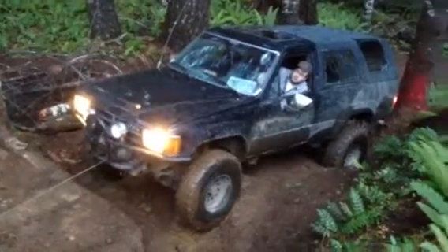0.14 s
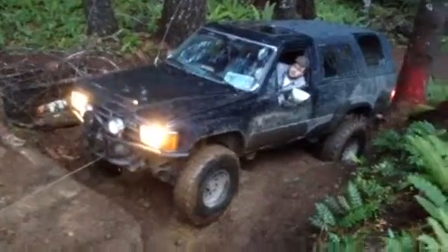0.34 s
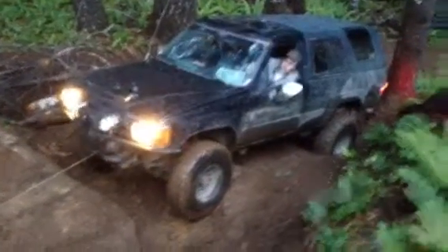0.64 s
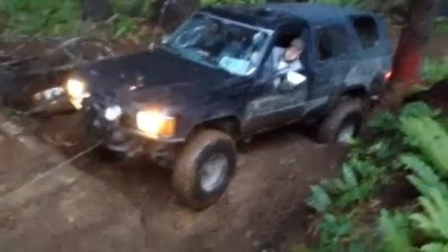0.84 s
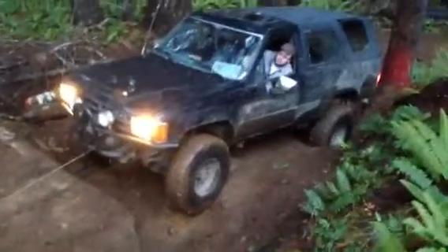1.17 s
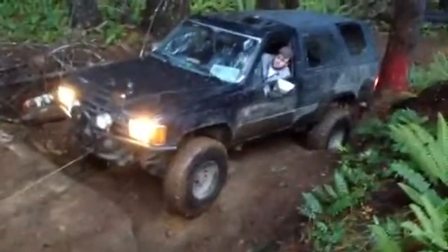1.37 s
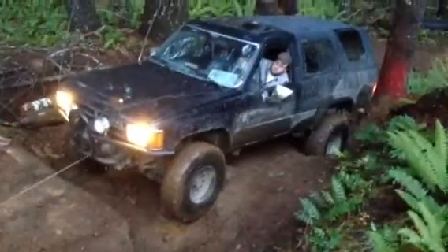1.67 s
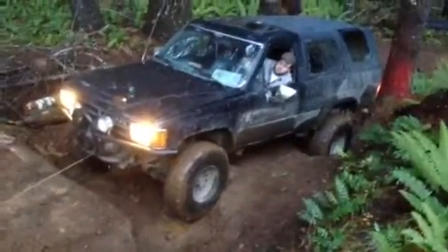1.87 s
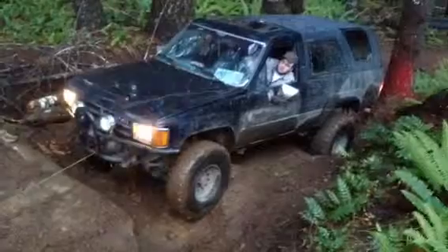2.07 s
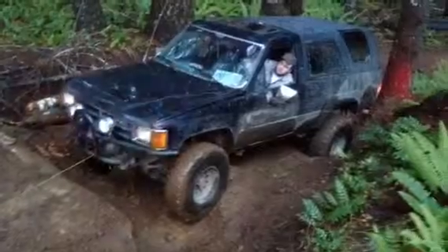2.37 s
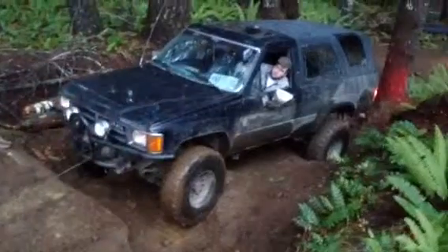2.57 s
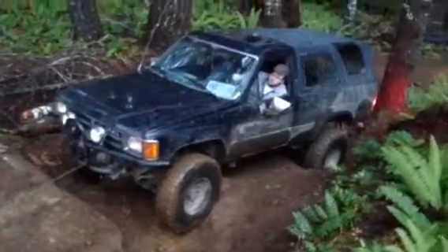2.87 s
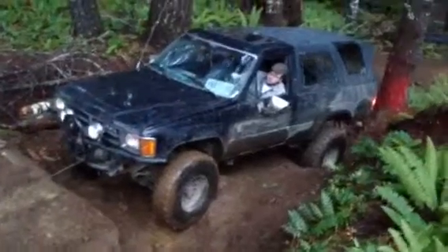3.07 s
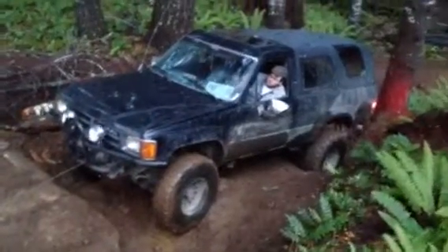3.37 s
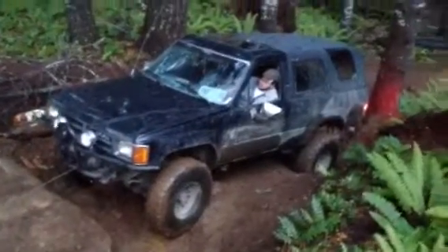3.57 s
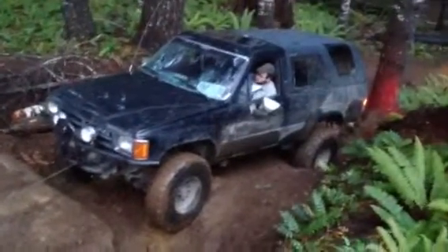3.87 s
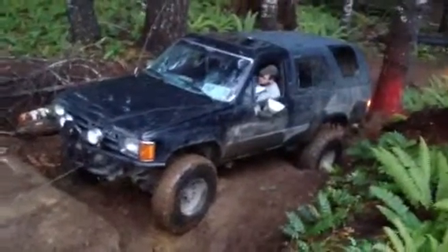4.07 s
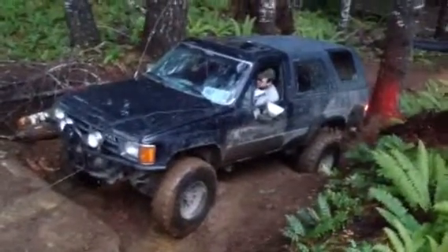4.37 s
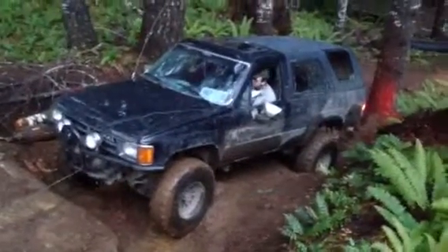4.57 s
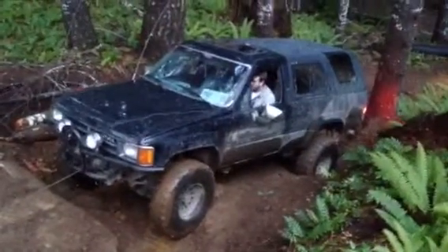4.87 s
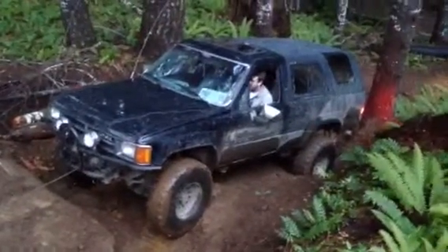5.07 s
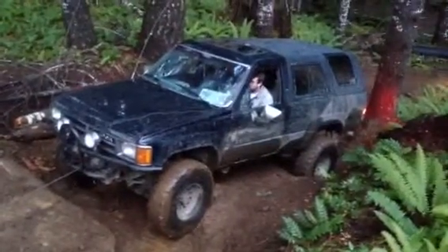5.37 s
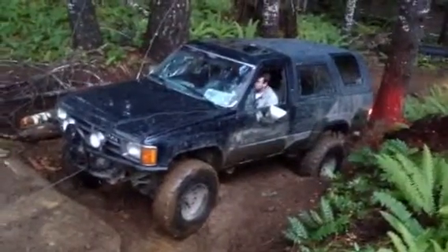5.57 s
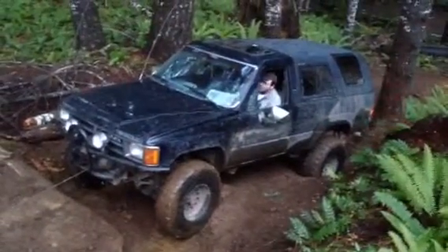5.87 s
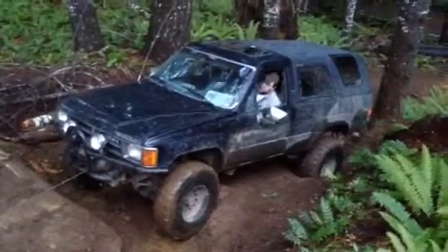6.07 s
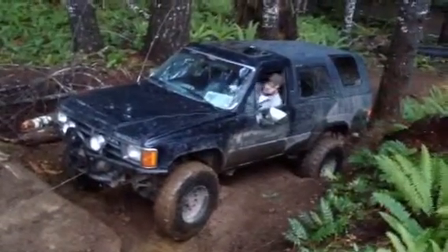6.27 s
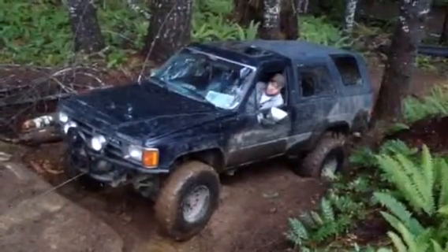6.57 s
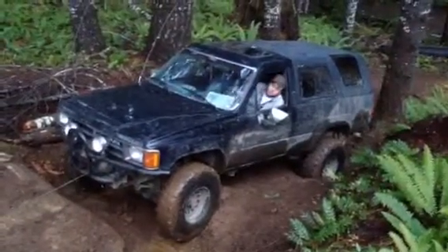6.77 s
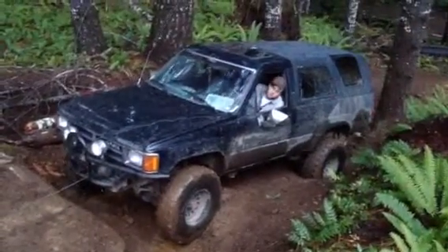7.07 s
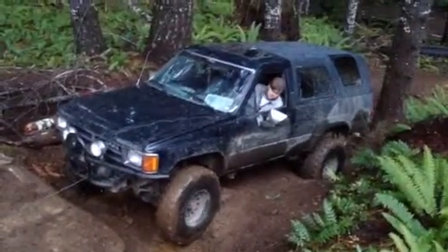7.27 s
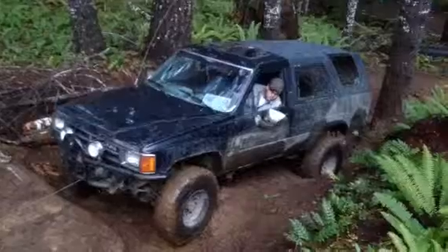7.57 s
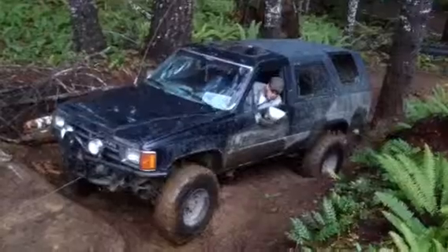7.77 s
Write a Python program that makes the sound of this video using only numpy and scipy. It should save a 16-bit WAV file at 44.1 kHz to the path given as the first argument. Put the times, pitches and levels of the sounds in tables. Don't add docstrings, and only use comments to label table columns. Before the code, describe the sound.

A muddy truck stands a few metres away on a forest trail, its four-cylinder engine idling throughout with a lumpy, low exhaust throb, small stumbles, light valve rattle and a steady broadband hiss of fan and gears. Thin, quiet belt chirps flick past at intervals from about 1.3 s. Close to the small, bass-light microphone, wet cloth brushes at 0 s, then rubs and squeaks at 0.8-1.1 s with a sharp snap near 1 s. A tiny crackle comes at 2.3 s; otherwise the idle dominates. Soft dull knocks fall at 5.0 s, with a short rustle and snap at 5.3 s. The engine begins pulling harder around 6 s and is more even from 6.6 s, as cloth and ferns rub busily with gliding squeaks and dry cracks until 7.4 s. At 7.6 s the throttle opens: air rushes in and firing quickens to the end, amid last rustles.

```python
import sys
import numpy as np
from scipy import signal
from scipy.fft import rfft, irfft, next_fast_len
from scipy.io import wavfile
from scipy.ndimage import uniform_filter1d, map_coordinates

SR = 44100
rng = np.random.default_rng(int(sys.argv[2]) if len(sys.argv) > 2 else 0)


def gain_from_db(level_db):
    decades = np.asarray(level_db, float) / 20
    return 10 ** decades


def store_pcm(level_fs):
    pcm = np.round(np.clip(level_fs, -1, 1) * 32767).astype(np.int16)
    wavfile.write(sys.argv[1], SR, np.atleast_2d(pcm).T)


N = 349713

# (frequency [Hz], level [dB per Hz])
MACHINE_HISS = [(220, 0), (380, -6), (472, -5.5), (577, -8.5), (643, -1.5), (946, -2), (1140, -7),
                (1550, -9.5), (1930, -7), (3260, -10.5), (4230, -8), (5510, -7.5), (7390, 0), (9600, -11.5),
                (15300, -19.5)]
# (first slip [s], slips [count], peak [dB], pitch [Hz])
BELT_SLIPS = [(1.28, 2, -53, 4320), (1.562, 2, -55, 4570), (1.79, 1, -53, 4380), (1.898, 8, -55.5, 4450),
              (3.70, 2, -54, 4350), (3.97, 1, -56, 4640), (4.164, 1, -54, 4170), (4.398, 1, -52, 4280),
              (4.838, 1, -55, 4640), (5.41, 4, -55, 4220), (5.86, 1, -53, 4800), (6.223, 1, -53, 4140),
              (6.321, 1, -57, 4640), (7.694, 1, -53, 4180), (7.735, 1, -55, 3800), (7.8, 1, -51, 3850),
              (7.83, 1, -51, 4250), (7.885, 1, -52, 3800)]
# (frequency [Hz], level [dB per Hz])
INTAKE_RUSH = [(500, -28), (2000, -17), (4200, -6), (5500, -10), (7500, 1.5), (9600, -11.5), (12500, -9),
               (15300, -24)]

# (time [s], peak [dB], body [dB re peak], decay by 60 dB [s])
SNAPS = [(0.7298, -35.5, -14, 0.056), (0.74, -37, -14, 0.029), (0.842, -33, -17, 0.033),
         (0.9775, -21.5, -14, 0.0095), (2.3494, -48, -16, 0.02), (5.3192, -31.5, -22, 0.045),
         (5.335, -36, -13, 0.039), (6.601, -32, -15, 0.029), (6.851, -27, -23, 0.065),
         (6.86, -35, -31, 0.027), (7.138, -28, -21, 0.02), (7.038, -42, -22, .02), (7.196, -45, -17, .02),
         (7.223, -37, -20, 0.018), (7.392, -35, -12, 0.025), (7.781, -41, -20, .03),
         (0.3653, -37, -14, 0.022), (1.717, -37, -20, .02), (7.244, -30.5, -23, 0.048),
         (7.313, -27, -30, 0.023), (7.3278, -27, -27, 0.052)]
# (frequency [Hz], level [dB per Hz])
CRACK_COLOUR = [(2000, -30), (3000, -31), (6500, 11), (9000, 3), (12000, -3.5), (15400, -18)]
# (time [s], peak [dB], pitch [Hz], decay by 60 dB [s])
KNOCKS = [(5.023, -41, 340, .07), (5.023, -44, 430, .06), (5.023, -49, 700, .05), (5.335, -48, 950, .04),
          (5.335, -52, 1750, .03), (2.88, -48, 420, .05), (5.023, -40, 190, .07), (5.233, -48, 330, .04),
          (5.485, -46, 620, .07), (5.485, -47, 1100, .04), (5.485, -48, 1480, .04), (5.485, -49, 380, .05),
          (6.6, -45, 950, .04), (7.35, -47, 430, .07), (7.725, -48, 650, .08), (7.78, -50, 780, .07),
          (7.82, -48, 690, .07), (7.855, -48, 700, .06), (7.87, -47, 780, .07), (7.915, -47, 620, .08),
          (.975, -47, 880, .05), (.31, -53, 720, .06)]
# (time [s], peak [dB])
FIBRE_TICKS = [(0.7324, -52), (0.7444, -55), (0.8434, -51), (0.9767, -49), (2.3494, -53), (5.3183, -49),
               (5.3343, -45), (6.8518, -38), (6.8574, -44), (6.8624, -49), (7.2434, -40), (7.2484, -44),
               (7.3123, -41), (7.3164, -42), (7.3284, -45), (7.3344, -46)]
# (frequency [Hz], level [dB per Hz])
FIBRE_COLOUR = [(4000, -30), (8000, -5), (11000, 0), (13500, 5), (15400, -6)]

# (start [s], peak [s], end [s], sizzle [dB], body [dB])
CLOTH_STROKES = [(-.1, 0.007, 0.21, -45, -52.5), (0.768, 0.894, 1.084, -45, -52.5),
                 (2.322, 2.348, 2.4, -56, -68), (4.945, 4.96, 4.8, -54, -60),
                 (5.33, 5.36, 5.4, -53.5, -57.5), (.86, 1, 1.0, -59, -59.5), (.24, .31, 0.44, -59, -59),
                 (5.315, 5.347, 5.32, -44.5, -52), (6.597, 6.602, 6.96, -55.5, -57),
                 (6.653, 6.888, 7.12, -44, -55), (7.137, 7.132, 7.3, -54, -57),
                 (7.194, 7.35, 7.43, -42.5, -51.5), (7.662, 7.703, 7.7, -50, -60),
                 (7.776, 7.8, 7.9, -47, -57), (7.86, 7.914, 7.9, -58, -54.5)]
# (frequency [Hz], level [dB per Hz])
SIZZLE_COLOUR = [(1470, -50), (2500, -48), (3540, -12), (3970, -14.5), (6020, -5), (6640, 1), (7720, 0.5),
                 (9330, -14.5), (12700, -20), (15300, -43)]
# (frequency [Hz], level [dB per Hz])
BODY_COLOUR = [(240, 4.5), (400, -1), (540, -8), (702, -1.5), (1680, -4), (2640, -8.5), (3500, -9.5),
               (4550, -12), (7700, -120)]
# (start [s], length [s], first pitch [Hz], last pitch [Hz], level [dB])
SQUEAKS = [(6.635, .16, 560, 1340, -58), (6.655, .03, 860, 1150, -58), (6.71, .07, 800, 1060, -59),
           (6.79, .07, 1300, 1400, -59), (6.66, .068, 1760, 2620, -61), (6.848, .025, 1520, 1900, -56),
           (7.17, .04, 620, 860, -56), (7.185, .1, 760, 1230, -60), (6.87, .12, 1020, 980, -61),
           (7.24, .145, 2100, 2400, -56), (7.308, .03, 1640, 1720, -48), (7.312, .025, 1800, 1880, -52),
           (7.312, .025, 1500, 1540, -55), (7.34, .08, 1780, 1700, -61), (.843, .02, 2270, 2330, -49.5),
           (.76, .21, 520, 1400, -61), (.768, .035, 600, 1020, -56), (.85, .05, 740, 700, -59),
           (.845, .03, 1620, 1560, -58), (0, .016, 1530, 1560, -52), (.03, .06, 1750, 1900, -63),
           (.92, .05, 700, 1050, -61), (4.948, .025, 2300, 2350, -60)]

# (frequency [Hz], width [Hz], level [dB])
BLOCK_MODES = [
    (727, 68, 0),
    (966, 110, 0),
]

# (time [s], firing rate [Hz])
FIRING_RATE = [(0.0, 31.33), (0.4, 33.01), (0.75, 30.35), (1.39, 30.93), (1.84, 32.47), (1.99, 31.43),
               (2.92, 32.86), (3.31, 30.02), (3.67, 31.42), (4.42, 30.3), (4.66, 32.37), (5.01, 31.02),
               (5.28, 33.24), (5.52, 31.93), (6.24, 34.93), (6.75, 32.81), (7.57, 32.26), (7.93, 45.6)]
# (time [s], level [dB])
THROTTLE_PUSH = [(0, -44), (.3, -38), (.58, -43.5), (.78, -37.5), (1.6, -38.5), (2.0, -39.5), (2.7, -40),
                 (3.3, -36.5), (4.5, -37.5), (5.05, -45.5), (5.25, -36.5), (5.45, -41.5), (6.0, -34),
                 (6.45, -33), (6.75, -39), (7.33, -40.5), (7.76, -30), (7.93, -32.5)]
# (strength [dB], moment [firings])
CYLINDERS = [
    (0, .828),
    (-1.2, .817),
    (-2.9, .825),
    (.2, .862),
]
# (time [s], share [0-1])
UNEVENNESS = [
    (0, 1),
    (6.42, 1),
    (6.6, .55),
    (7.38, .55),
    (7.5, .9),
    (7.93, .9),
]
# (time [s], loss [dB])
STUMBLES = [(.64, 5), (1.94, 8.5), (2.67, 14), (2.93, 5), (3.17, 4.5), (4.36, 2.5), (5.43, 0), (7.45, 9)]
# (time [s], low modes [dB], upper modes [dB])
EXHAUST_GAIN = [(0.11, 5.5, -3), (0.44, -4.5, 2), (0.71, 6, 1.5), (0.78, 1, -11), (1.11, -0.5, 1.5),
                (1.23, 4.5, -7), (1.36, 5, -1), (1.84, 0.5, 4.5), (1.95, -3, 7), (2.04, 0, 3.5), (2.14, 4, -1),
                (2.34, -1.5, 2.5), (2.66, 4, 4), (2.74, 6, -8.5), (2.83, -3, 4), (3.15, 0, 2.5), (3.22, -4, -9),
                (3.45, -4.5, -0.5), (3.51, 1.0, -1.5), (3.63, 2, -1), (3.86, -1.5, -8), (4.01, 1.5, -3.5),
                (4.42, -3.5, -4), (4.52, 1, -6), (4.59, -1, 4.0), (4.71, 1, -3), (4.77, 1.5, -0.5),
                (4.88, 3, -1.5), (5.06, 12, 0), (5.32, 0.5, 4), (5.43, -6, 3), (5.98, -1.0, -6), (6.1, -0.5, -6),
                (6.22, -1.5, -3), (6.33, -1.5, -5.5), (6.49, 0, 4.5), (6.7, -2.5, 2.5), (6.92, -1.5, 1),
                (7.13, 2, 0.5), (7.26, 3.5, -0.5), (7.43, -5.0, 2), (7.68, -0.5, -18), (7.75, -2.5, -3.5),
                (7.81, 5, 9)]
# (time [s], level [dB])
LOW_GAIN = [(0.0, 11), (0.179, 0), (0.797, -8), (0.83, 5), (0.979, 4), (1.059, -4), (1.122, 8.5),
            (1.173, -10), (1.32, -5), (1.455, -4), (1.532, 3), (1.583, -2), (1.65, 1), (2.012, 6),
            (2.071, -3), (2.214, -2), (2.42, 2.5), (2.955, -5), (3.267, 4), (3.593, -6), (3.837, -8),
            (3.884, 6), (3.925, -6), (4.108, -5), (4.335, -6), (4.402, 9), (4.568, 4), (4.84, 5),
            (4.885, -4), (4.946, 6)]
# (time [s], level [dB])
UPPER_GAIN = [(0.019, 3.5), (0.221, -5), (0.35, 5), (0.394, -7), (0.432, -1), (0.54, 3), (0.735, 9),
              (0.828, 3), (0.944, -3), (0.997, 3), (1.107, 1.5), (1.367, -4), (1.423, 3), (1.482, -6),
              (1.518, 5), (1.625, -2), (1.82, -1.5), (2.032, 0.5), (2.14, 3), (2.251, -1.5), (2.42, -1.5),
              (2.46, 3.5), (2.546, -4), (2.581, -2), (2.974, 3.5), (3.093, -3), (3.139, 3), (3.213, -3),
              (3.374, -8), (3.449, 4), (3.502, -11), (3.627, -3), (3.666, 4), (3.737, 0.5), (3.88, -9),
              (4.135, -1), (4.174, -5), (4.423, -10), (4.468, 5), (4.526, -1), (4.561, 0), (4.756, 3.5),
              (4.928, -6), (4.994, 2.5), (5.046, -18), (5.627, 4.5), (5.724, 1), (5.881, -1), (5.923, 4.5),
              (5.975, -6), (6.085, 1), (6.381, 6), (6.42, -4), (6.558, -6), (6.619, 2), (6.816, -3.5),
              (7.053, -4), (7.163, -1), (7.313, -4), (7.612, 4)]
# (position [firings], low swell [dB], upper bend [Hz])
CRANK_CYCLE = [(.25, 1, 3.5), (.75, 0.5, 0), (1.25, -1, -3.5), (1.75, -2.5, -0.5), (2.25, -0.5, -2),
               (2.75, -1, -3.5), (3.25, 0.5, -3), (3.75, 0, 1.5)]
# (frequency [Hz], width [Hz], level [dB])
PIPE_LOW = [(58.7, 17, -26), (98, 47, -53), (132.8, 8.4, 0.5), (149.4, 21.2, -11)]
# (frequency [Hz], width [Hz], level [dB])
PIPE_UPPER = [(200.1, 2.3, 0.5), (247.4, 14, -6.5), (261.63, 8.6, 11.5), (263, 45, -8.5), (298, 45, -37)]
# (frequency [Hz], level [dB per Hz])
RUMBLE_COLOUR = [(25, -3), (50, -19), (110, 12.5), (150, 14), (178, 4.5), (197, 13.5), (213, 9),
                 (260, 15.5), (330, -2), (450, -11.5), (560, -62)]


def unit(x):
    return x / np.sqrt(np.mean(x ** 2) + 1e-20)


def curves(rows):
    s, *columns = np.transpose(rows)
    return [np.interp(np.arange(N) / SR, s, column) for column in columns]


def bumps(rows, width_s):
    t = np.arange(0, N / SR + .01, .005)
    sums = sum(np.outer(db, np.exp(-((t - s) / width_s) ** 2)) for s, *db in rows)
    return curves(np.c_[t, sums.T])


def wobble(rate):
    knots = rng.standard_normal(int(N * rate / SR) + 4)
    return map_coordinates(knots, [np.arange(N) * rate / SR])


def add_at(out, start_s, sound):
    out[round(start_s * SR):][:len(sound)] += sound


def filtered(x, response):
    m = next_fast_len(len(x) + SR // 2)
    return irfft(rfft(x, m) * response(np.fft.rfftfreq(m, 1 / SR)), m)[:len(x)]


def coloured(x, spectrum):
    hz, db = np.transpose(spectrum)
    return unit(filtered(x, lambda f: gain_from_db(np.interp(np.log(f + 1), np.log(hz), db, -120, -120))))


def modes(table):
    def response(f):
        total = 0
        for k, (centre, width, db) in enumerate(table):
            damping = 1j * f * width
            total = total + (-1) ** k * gain_from_db(db) * damping / (centre * centre - f * f + damping)
        return total
    return response


def grit(spike_db):
    size_db = spike_db * rng.standard_normal(N // 64 + 1)
    return rng.standard_normal(N) * gain_from_db(size_db.repeat(64)[:N])


def patchy(x, patch_db):
    z = signal.stft(x, nperseg=1024)[2]
    field = uniform_filter1d(rng.standard_normal(z.shape), size=4, axis=0)
    field = uniform_filter1d(field, size=3, axis=1)
    return signal.istft(z * gain_from_db(patch_db * unit(field)), nperseg=1024)[1][:N]


def machine(phase):
    pulse_db = 0.15 * np.cos(np.pi * phase) + 0.35 * wobble(5) + 0.5 * wobble(14)
    hiss = coloured(patchy(grit(spike_db=0.9), patch_db=2.0), MACHINE_HISS)
    return gain_from_db(-52.5 + pulse_db) * hiss


def belt():
    lap_s = .171
    out, t = np.zeros(N + SR), np.arange(SR // 20) / SR
    swell = np.sin(np.pi * np.clip(t / 0.067, 0, 1)) ** 2
    for first, slips, db, hz in BELT_SLIPS:
        for lap in range(slips):
            shake = np.cumsum(rng.normal(0, .09, len(t)))
            size_db, bend = rng.normal(0, [1.2, .015]) * (slips > 1)
            whistle = np.sin(2 * np.pi * hz * (1 + bend) * t + shake)
            add_at(out, first + lap * lap_s, gain_from_db(db - 10 + size_db) * swell * whistle)
    return out[:N]


def intake():
    open_s, rise_s = 7.61, .04
    opening = 1 - np.exp(-np.clip(np.arange(N) / SR - open_s, 0, None) / rise_s)
    rush = coloured(patchy(grit(spike_db=1.5), patch_db=1.5), INTAKE_RUSH)
    return gain_from_db(-49 + .8 * wobble(25.12)) * opening * rush


def snaps():
    top, body, t = np.zeros(N + SR), np.zeros(N + SR), np.arange(SR // 8) / SR
    for s, db, body_db, t60 in SNAPS:
        fade = gain_from_db(-60 * t / t60) * (1 - np.exp(-t / .0005))
        add_at(top, s, gain_from_db(db - 9.5) * fade)
        add_at(body, s, gain_from_db(db + 2.5 + body_db) * fade)
    white = rng.standard_normal((2, N))
    return top[:N] * coloured(white[0], CRACK_COLOUR) + body[:N] * coloured(white[1], BODY_COLOUR)


def knocks():
    out, t = np.zeros(N + SR), np.arange(SR // 8) / SR
    for s, db, hz, t60 in KNOCKS:
        tone = np.sin(2 * np.pi * hz * t + np.cumsum(rng.normal(0, .1, len(t))))
        add_at(out, s, gain_from_db(db - 60 * t / t60) * (1 - np.exp(-t / .002)) * tone)
    return out[:N]


def ticks():
    out, t = np.zeros(N + SR), np.arange(SR // 40) / SR
    t60 = .009
    for s, db in FIBRE_TICKS:
        add_at(out, s, gain_from_db(db - 4 - 60 * t / t60))
    return out[:N] * coloured(rng.standard_normal(N), FIBRE_COLOUR)


def rubbing():
    grip_db, lift_db = -10, -16
    body_swing, edge_s = 0.65, 0.0069
    t, sizzle, body = np.arange(0, N / SR + .01, .001), 0, 0
    for start, peak, end, sizzle_db, body_db in CLOTH_STROKES:
        press_db = np.interp(t, [start, peak, end], [grip_db, 0, lift_db])
        touch = np.clip(np.minimum(t - start, end - t) / edge_s + 1, 0, 1)
        sizzle = sizzle + touch * gain_from_db(sizzle_db + press_db)
        body = body + touch * gain_from_db(body_db + body_swing * press_db)
    sizzle, body = curves(np.c_[t, sizzle, body])
    clumps = gain_from_db(1.57 * wobble(40))
    sizzle = sizzle * coloured(patchy(grit(spike_db=-0.5), patch_db=3.5), SIZZLE_COLOUR)
    body = body * coloured(patchy(grit(spike_db=0.0), patch_db=1.5), BODY_COLOUR)
    return clumps * (sizzle + body)


def squeaks():
    settle, least_glide_s, latest_peak = .31, .05, .72
    out, flutter, waver = np.zeros(N), gain_from_db(1.5 * wobble(60)), 1 + .008 * wobble(90)
    for start, length, from_hz, to_hz, db in SQUEAKS:
        u = np.arange(round(length * SR)) / (length * SR)
        span = round(start * SR) + np.arange(len(u))
        hz = to_hz + (from_hz - to_hz) * np.exp(-u / max(settle, least_glide_s / length))
        peak = latest_peak * np.tanh((to_hz / 2000) ** 3)
        swell = np.interp(u, [0, peak, 1], [0, 1, 0]) ** .8
        tone = np.sin(2 * np.pi * np.cumsum(hz * waver[span]) / SR)
        out[span] += swell * gain_from_db(db + 4) * flutter[span] * tone
    return out


def block(phase):
    tap_s, sharpness = 3.605, 1.8
    cycle = np.pi / 2 * (phase - phase[round(tap_s * SR)])
    tap = np.exp(sharpness * (np.cos(cycle) - 1)) * gain_from_db(6.0 * wobble(6))
    lower, upper = (unit(filtered(grit(spike_db=2.0), lambda f: modes([m])(f) ** 2)) for m in BLOCK_MODES)
    return gain_from_db(-72.5 + 1.8 * wobble(15)) * lower + gain_from_db(-66.5) * tap * upper


def exhaust(phase, uneven, drive_db, pipe, silencer):
    lead = SR // 4
    count = np.arange(-8, int(phase[-1]))
    pattern = np.array(CYLINDERS)
    share = uneven * np.interp(count, phase, curves(UNEVENNESS)[0])[:, None]
    average = pattern.mean(0)
    strength_db, moment = (average + share * (pattern - average)[count % 4]).T
    chance = uneven * rng.standard_normal((400, 2))[count]
    turn = np.r_[np.arange(-lead, 0) * phase[0], phase]
    at = np.interp(count + moment + .005 * chance[:, 0], turn, np.arange(N + lead)).astype(int)
    push_db = np.pad(drive_db, (lead, 0), "edge")[at]
    puffs = np.bincount(at, gain_from_db(strength_db + .6 * chance[:, 1] + push_db), N + lead)
    return unit(filtered(puffs, lambda f: modes(pipe)(f) * modes(silencer)(f) ** 2)[lead:])


def crank(phase, low, upper):
    turn, swell_db, bend_hz = np.transpose(CRANK_CYCLE)
    n = np.arange(N)
    idle = np.interp(n / SR, [5.2, 5.8], [1, 0])
    swell_db = idle * np.interp(phase, turn, swell_db - swell_db.mean(), period=4)
    bend_hz = idle * np.interp(phase, turn, bend_hz - bend_hz.mean(), period=4)
    upper_hz = 260
    return gain_from_db(swell_db) * low, np.interp(n + np.cumsum(bend_hz) / upper_hz, n, upper)


def engine(phase):
    push_db, = curves(THROTTLE_PUSH)
    loss_db, = bumps(STUMBLES, width_s=.035)
    upper_push_db = .044 * push_db
    low = exhaust(phase, uneven=.5, drive_db=push_db - loss_db, pipe=PIPE_LOW, silencer=[(120, 130, 0)])
    upper = exhaust(phase, uneven=1.4, drive_db=upper_push_db - loss_db, pipe=PIPE_UPPER,
                    silencer=[(255, 170, 0)])
    low, upper = crank(phase, low, upper)
    low_db, upper_db = bumps(EXHAUST_GAIN, width_s=.04)
    low_db = low_db + bumps(LOW_GAIN, width_s=.025)[0]
    upper_db = upper_db + bumps(UPPER_GAIN, width_s=.025)[0]
    rumble = gain_from_db(-50.5 + 0.24 * wobble(8.3)) * coloured(rng.standard_normal(N), RUMBLE_COLOUR)
    return gain_from_db(low_db - 38.5) * low + gain_from_db(upper_db - 43.0) * upper + rumble


def scene():
    phase = np.cumsum(curves(FIRING_RATE)[0]) / SR
    air = machine(phase) + belt() + intake()
    undergrowth = snaps() + knocks() + ticks() + rubbing() + squeaks()
    return (air + undergrowth + block(phase) + engine(phase))[None]


def roll_off(x):
    return signal.sosfilt(signal.butter(12, 15420, fs=SR, output="sos"), x)


def record(dry):
    microphone, top_hz = modes([(800, 11700, 0)]), 15330
    heard = filtered(dry[0], lambda hz: microphone(hz) * (hz < top_hz))
    return roll_off(heard[None])


dry = scene()
out = record(dry)
store_pcm(out)
```